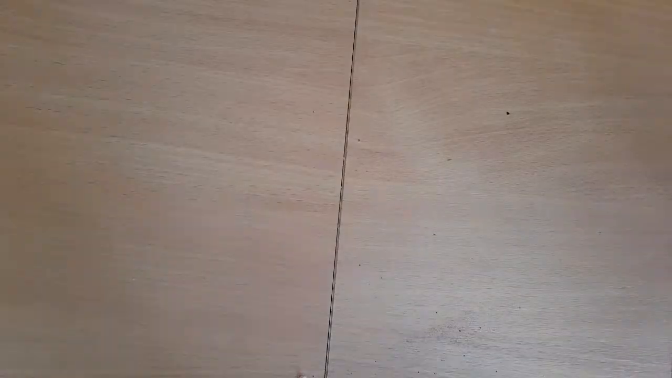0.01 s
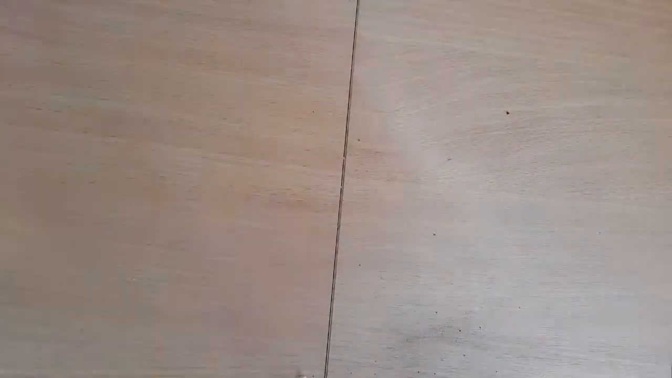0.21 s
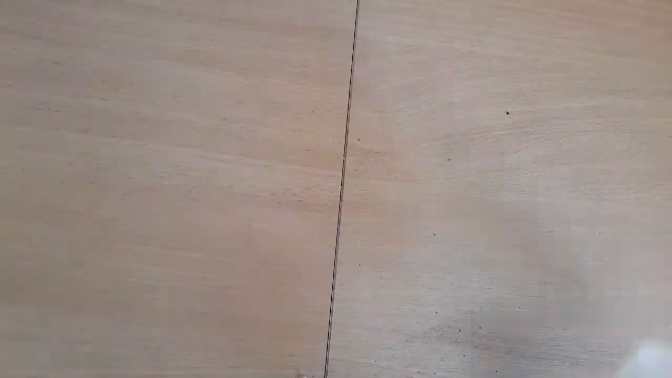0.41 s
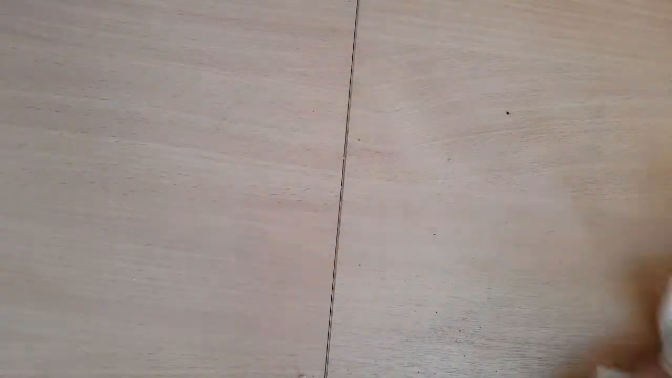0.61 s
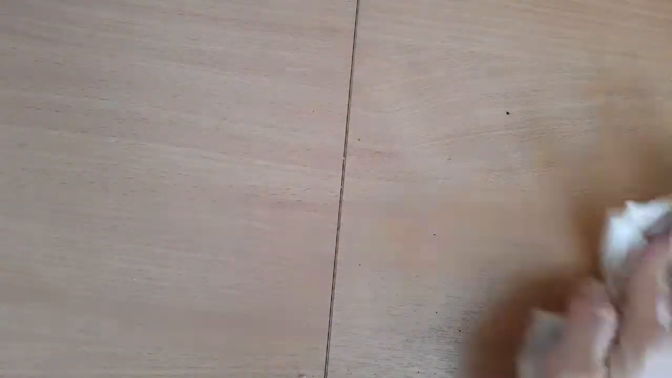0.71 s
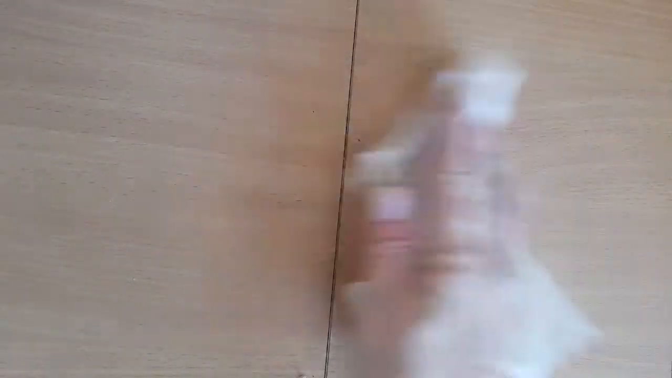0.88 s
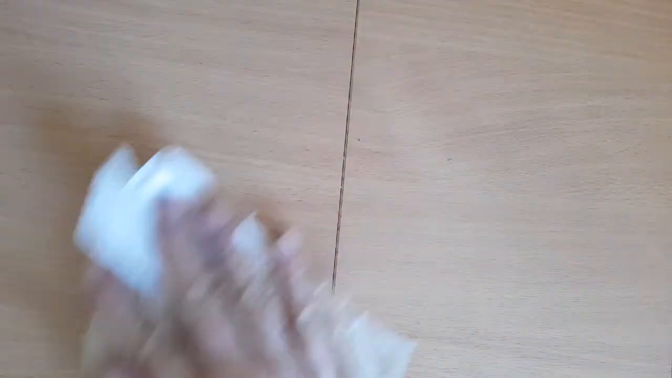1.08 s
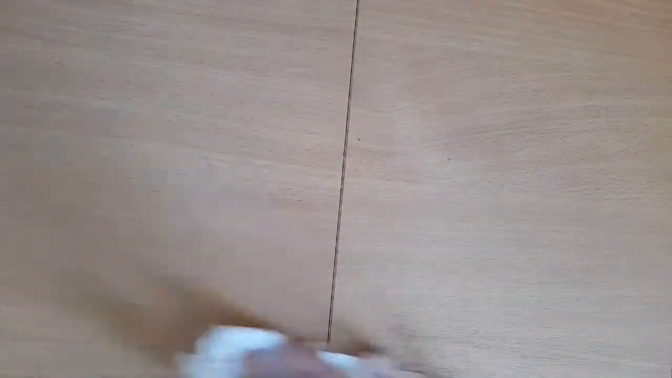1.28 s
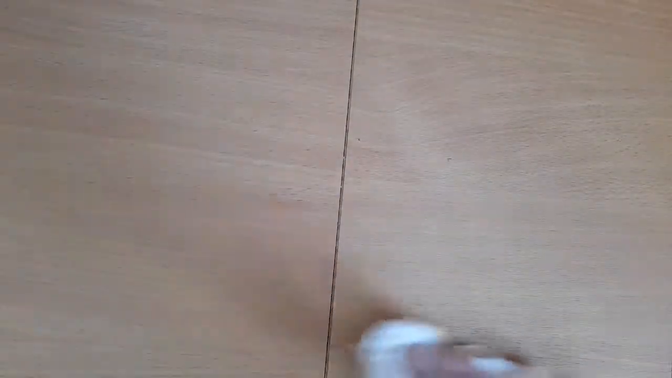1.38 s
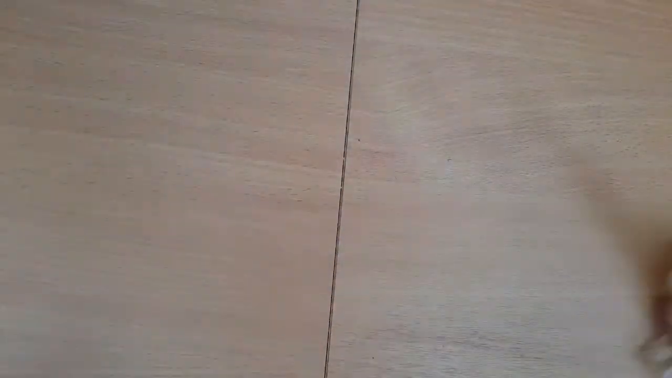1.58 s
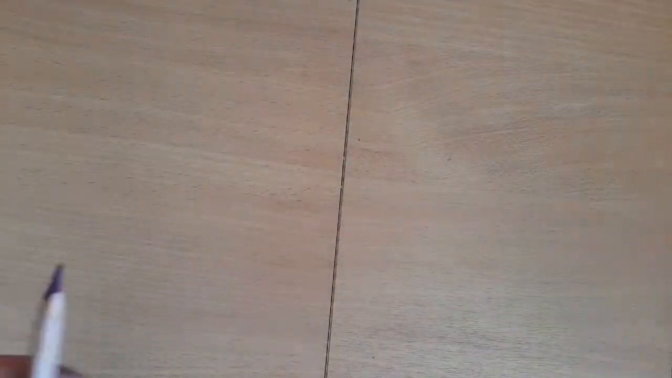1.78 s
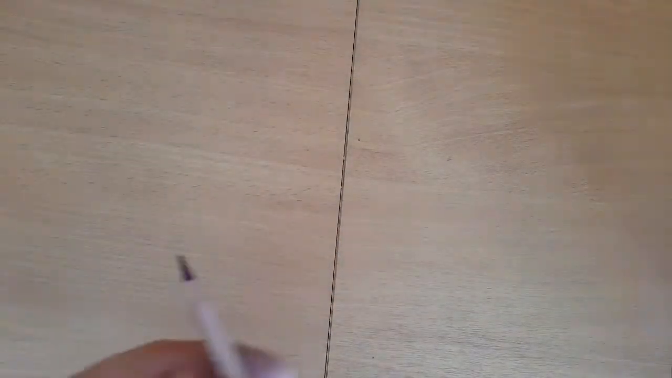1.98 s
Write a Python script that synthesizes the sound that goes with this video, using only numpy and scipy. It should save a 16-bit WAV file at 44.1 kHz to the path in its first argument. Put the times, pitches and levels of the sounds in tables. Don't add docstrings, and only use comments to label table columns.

```python
import sys
import numpy as np
from scipy import signal
from scipy.io import wavfile
from scipy.ndimage import uniform_filter1d, map_coordinates

SR = 44100
rng = np.random.default_rng(int(sys.argv[2]) if len(sys.argv) > 2 else 0)


def output_pcm(signal):
    pcm = np.clip(np.atleast_2d(signal).T, -1, 1) * 32767
    wavfile.write(sys.argv[1], SR, np.round(pcm).astype(np.int16))


def gain_from_db(level_db):
    decades = np.asarray(level_db, float) / 20
    return 10 ** decades


N = 90405


def rms_one(x):
    return x / np.sqrt(np.mean(x ** 2) + 1e-20)


def in_time(rows):
    s, *columns = np.transpose(rows)
    return [np.interp(np.arange(N) / SR, s, column) for column in columns]


def at_hz(points, hz):
    f, value = np.transpose(points)
    return np.interp(np.log(hz), np.log(f), value)


def band(x, low_hz, high_hz):
    return signal.sosfilt(signal.butter(2, [low_hz, high_hz], "band", fs=SR, output="sos"), x)


def drift(rate_hz):
    hop, settle = 40, 2000
    r = np.exp(-2 * np.pi * hop * rate_hz / SR)
    noise = rng.standard_normal(N // hop + settle + 2)
    slow = signal.lfilter([1], [1, -2 * r, r * r], noise)[settle:]
    return np.interp(np.arange(N) / hop, np.arange(len(slow)), rms_one(slow))


def ring(clicks, hz, t60_s):
    r, w = gain_from_db(-60 / (t60_s * SR)), 2 * np.pi * hz / SR
    return signal.lfilter([0, np.sin(w)], [1, -2 * r * np.cos(w), r * r], clicks + 1e-18)


def resonate(x, peaks):
    out = 0
    for k, (hz, width_hz, db) in enumerate(peaks):
        r = np.exp(-np.pi * width_hz / SR)
        poles = [1, -2 * r * np.cos(2 * np.pi * hz / SR), r * r]
        out = out + (-1) ** k * gain_from_db(db) * rms_one(signal.lfilter([1, 0, -1], poles, x))
    return out


def hollow(x, hz, width_hz):
    out, r, state = np.zeros_like(x), np.exp(-np.pi * width_hz / SR), np.zeros((2, 2))
    for i in range(0, N, 128):
        w = 2 * np.pi * hz[i] / SR
        poles = [1, -2 * r * np.cos(w), r * r]
        gain = np.abs(np.polyval(poles, np.exp(1j * w))) / np.sin(w)
        out[:, i:i + 128], state = signal.lfilter([gain, 0, -gain], poles, x[:, i:i + 128], zi=state)
    return rms_one(out)


def coloured(white, spectrum, patchy_db, rate_hz):
    # (frequency [Hz], coherence [0-1])
    likeness = [(60, 1), (250, 0.64), (700, 0.68), (1400, 0.63), (3000, 0.02), (7000, 0)]
    out, together = 0, drift(rate_hz)
    lowest_hz, highest_hz = spectrum[0][0], spectrum[-1][0]
    count = int(3 * np.log2(highest_hz / lowest_hz)) + 2
    edges = np.geomspace(lowest_hz, min(highest_hz, .45 * SR), count)
    for k, (low, high) in enumerate(zip(edges, edges[1:])):
        mid, side = band(white[k % 2], low, high)
        hz = np.sqrt(low * high)
        alike = np.clip(at_hz(likeness, hz), 0, 1)
        gain = gain_from_db(at_hz(spectrum, hz) + patchy_db * (0.6 * together + drift(rate_hz)))
        out = out + gain * (np.sqrt(1 + alike) * mid + np.sqrt(1 - alike) * side * [[1], [-1]])
    return rms_one(out)


def hum():
    # (frequency [Hz], density [dB per Hz])
    rumble = [(15, -20), (30, -1), (60, 0.5), (100, 3.5), (160, 0), (250, -16), (350, -28), (600, -22),
              (1100, -36)]
    # (frequency [Hz], width [Hz], level [dB])
    hum_modes = [(87.8, 23, -65), (120.5, 9.6, -66.5), (189.6, 13, -72.5)]
    mid, side = rng.standard_normal((2, N + SR))
    modes = resonate(mid + 0.27 * side * [[1], [-1]], hum_modes)[:, SR:]
    return modes + gain_from_db(-65.5) * coloured(rng.standard_normal((2, 2, N)), rumble, patchy_db=1.0, rate_hz=11)


def rustles():
    # (time [s], length [s], level [dB], lowest [Hz], highest [Hz])
    fold_bursts = [(0.0, 0.078, -61, 1780, 6000), (0.125, 0.036, -64.5, 3000, 3540),
                   (0.183, 0.0075, -49.5, 2500, 13500), (0.308, 0.0058, -61, 2000, 14000),
                   (0.188, .03, -53, 150, 700), (0.714, .075, -42, 1240, 1800),
                   (1.022, 0.115, -50, 1180, 1820), (0.977, 0.03, -42.5, 1870, 7500),
                   (1.144, 0.052, -46.5, 1160, 2050), (1.878, .004, -57, 5000, 9000),
                   (1.9, 0.015, -57, 2500, 10000), (1.901, 0.072, -65.5, 2680, 3100),
                   (1.919, 0.048, -64.5, 3140, 5130), (1.978, .003, -67, 3000, 7000),
                   (2.026, .003, -75, 5000, 9000)]
    rise_s, fall_s, linger_s = 0.0065, 0.0058, 0.014
    t = np.arange(N) / SR
    paper = rng.standard_normal((2, N)) * gain_from_db(2 * drift(160))
    out = 0
    for s, length_s, db, low_hz, high_hz in fold_bursts:
        envelope = np.minimum((t - s) / rise_s, (s + length_s + linger_s - t) / fall_s)
        out = out + gain_from_db(db) * np.clip(envelope, 0, 1) * rms_one(band(paper, low_hz, high_hz))
    return out


def hiss(speed_db, sheen_hz):
    # (frequency [Hz], density [dB per Hz])
    fibre_spectrum = [(290, -76), (500, -38), (640, -35), (919, -25), (1250, -14.5), (2010, -11.5),
                      (3200, -4.5), (10800, -4), (16000, -4.5)]
    fibres = coloured(rng.standard_normal((2, 2, N)), fibre_spectrum, patchy_db=1.13, rate_hz=33)
    sheen = hollow(rng.standard_normal((2, N)), np.clip(sheen_hz, 3000, 15000), width_hz=4300)
    return gain_from_db(speed_db) * (fibres + gain_from_db(-4.5) * sheen) + rustles()


def grains():
    grains_per_s, spread_db, clump_db = 4000, 2.5, 1.5
    size = gain_from_db(spread_db * np.minimum(rng.exponential(1, N), 5))
    born = rng.random(N) < grains_per_s * gain_from_db(clump_db * drift(90)) / SR
    burst = uniform_filter1d(size * born, size=12) + 0.022
    return burst * rng.standard_normal((2, 2, N))


def drag():
    # (time [s], level [dB], hollow under the hand [Hz], weight on the boards [dB])
    pressure = [(0.0, -59.5, 1960, -19), (0.13, -63.5, 1760, -14), (0.18, -57.5, 830, -13),
                (0.24, -48, 760, -0.5), (0.32, -43.5, 1050, -6), (0.59, -47.5, 880, -14),
                (0.64, -39.5, 1010, -9.5), (0.76, -38, 1380, -17.5), (0.8, -44.5, 1310, -22),
                (0.95, -57.5, 1440, -21.5), (0.99, -46.5, 1120, -25), (1.04, -50.5, 1510, -21.5),
                (1.5, -63, 1480, -10), (1.58, -52, 1190, -20.5), (1.72, -57.5, 1540, -18.5),
                (1.81, -54, 1310, -38), (1.87, -57.5, 1050, -25), (2.0, -77, 900, -17)]
    # (frequency [Hz], density [dB per Hz])
    scrape_spectrum = [(260, -60), (450, -21), (583, -4.5), (645, 8), (835, -10), (951, 1.5), (1130, -6),
                       (4300, -3), (14000, -32.5)]
    # (frequency [Hz], width [Hz], level [dB])
    table_modes = [(671, 28, -4), (705, 180, 2.5), (874, 9, -3.5), (937, 22, 3.5), (1216, 8, -4.5),
                   (1313, 7, 5), (1470, 61, -3.5), (1570, 6, -7), (1804, 10, 2.5), (2702, 36, 6),
                   (4670, 55, -8)]
    # (lowest [Hz], highest [Hz])
    boards_hz = (148, 394)
    db, hollow_hz, weight_db = in_time(pressure)
    scrape = coloured(grains(), scrape_spectrum, patchy_db=.8, rate_hz=40)
    mid, side = band(rng.standard_normal((2, N)), *boards_hz)
    boards = rms_one(mid + 0.41 * side * [[1], [-1]]) * gain_from_db(weight_db + 1.6 * drift(70))
    cup = hollow(scrape, np.clip(hollow_hz, 300, 3000), width_hz=740)
    wood = rms_one(resonate(scrape, table_modes))
    return gain_from_db(db) * (gain_from_db(-1.5) * scrape + gain_from_db(-5.5) * cup + gain_from_db(-6) * wood + boards)


def catches():
    # (time [s], peak [dB], ring [Hz], run of slips [s], crack [dB])
    catch_events = [(0.189, -36, 850, 0.0071, 7), (.229, -28.5, 810, 0.0086, -11),
                    (.253, -29, 826, 0.011, -8), (.265, -31, 1950, .003, -3), (.266, -32.5, 764, 0.0044, 2),
                    (.277, -23, 335, 0.0067, 0), (.305, -29, 546, 0.0067, 5.5),
                    (.372, -29.5, 948, 0.0066, 9.5), (.389, -28.5, 705, 0.0042, 5),
                    (.416, -29, 906, 0.0044, 6), (.443, -31, 910, .004, 3), (.479, -61, 820, 0.0035, 0),
                    (.557, -33, 723, 0.005, 4), (.609, -28.5, 750, 0.0024, 2), (0.655, -35, 953, .01, 5),
                    (0.666, -24.5, 1280, 0.0023, -2), (0.675, -33, 1430, 0.0016, -5),
                    (0.71, -33, 1340, .006, 6), (0.721, -27, 1390, 0.0095, -8),
                    (.727, -32, 770, 0.0036, -15), (0.7553, -21.5, 1500, 0.0027, -26),
                    (.755, -32, 1830, 0.0044, -6), (.765, -32.5, 1588, 0.0091, -15),
                    (0.789, -34, 1395, .005, -4), (0.992, -33.5, 900, 0.0037, 8),
                    (1.175, -41.5, 1402, 0.022, 10), (1.603, -44.5, 1172, 0.0089, 9),
                    (1.81, -45, 780, 0.0049, -2), (1.875, -39, 1220, .002, -8),
                    (1.885, -43, 1240, .003, -6), (1.912, -46.5, 920, 0.0032, 5),
                    (1.955, -45, 740, .003, -5)]
    t60_s, tone_db, all_cracks_db = 0.017, -4, -2.5
    size = 4096
    out, t = np.zeros(N + size), np.arange(size) / SR
    for s, db, hz, run_s, crack_db in catch_events:
        uneven, noise = rng.uniform(0.15, 1, size), rng.standard_normal(size)
        new_cycle = np.diff(np.floor(t * hz), prepend=-1) > 0
        slips = new_cycle * (t <= run_s) * uneven / np.sqrt(1 + run_s * hz)
        tone = band(ring(slips, hz, t60_s), .5 * hz, 2 * hz)
        crack = band(gain_from_db(-60 * t / (t60_s + run_s)) * noise, 1900, 3900)
        start = int(s * SR)
        out[start:start + size] += gain_from_db(db) * (gain_from_db(tone_db) * tone + gain_from_db(all_cracks_db + crack_db) * crack)
    return out[:N]


def thumps():
    # (time [s], peak [dB])
    palm_blows = [
        (0.213, -48.5),
        (0.271, -45),
        (0.297, -44),
        (0.561, -44.5),
        (0.665, -35),
        (0.759, -48),
        (1.169, -43.5),
        (1.534, -49),
        (1.631, -50.5),
    ]
    # (frequency [Hz], level [dB], t60 [s])
    plate_modes = [(99.3, 2, 0.19), (128, -13, 0.052), (176, -11.5, 0.097), (326, -17, 0.04)]
    s, db = np.transpose(palm_blows)
    pan_db = 1.5 * np.outer([.5, -.5], (-1) ** np.arange(len(s)))
    pushes = np.zeros((2, N))
    pushes[:, (s * SR).astype(int)] = gain_from_db(db + pan_db)
    soft_palm = signal.butter(4, 186, fs=SR, output="sos")
    pushes = signal.sosfilt(soft_palm, pushes + 1e-18)
    plate = sum(gain_from_db(level_db) * ring(pushes, hz, t60_s) for hz, level_db, t60_s in plate_modes)
    return signal.sosfilt(signal.butter(2, 47, "high", fs=SR, output="sos"), plate)


def snap():
    # (frequency [Hz], level [dB], t60 [s])
    fold_modes = [(6500, -1, .001), (9000, -5, .0012), (12000, -7, .001), (14500, -7, .001)]
    snap_s, snap_db, left_db, left_lag_s = .75346, -12, -7, .0002
    growing = [(.00046, -12), (.00031, -5), (.00016, -3)]  # (lead [s], level [dB])
    sharp = [(.00012, 0)]
    out = np.zeros((2, N))
    for k, (hz, ring_db, t60_s) in enumerate(fold_modes):
        click = np.zeros((2, N))
        for before_s, db in growing if k == 0 else sharp:
            click[0, int((snap_s + left_lag_s - before_s) * SR)] = gain_from_db(snap_db + db + left_db)
            click[1, int((snap_s - before_s) * SR)] = gain_from_db(snap_db + db)
        out += gain_from_db(ring_db) * ring(click, hz, t60_s)
    return band(out, 3000, 16000)


def placed(x, pan_db, lag_ms):
    lag, i = lag_ms * SR / 2000, np.arange(N)
    left = map_coordinates(x[0], [i - lag], order=5, mode="nearest")
    right = map_coordinates(x[1], [i + lag], order=5, mode="nearest")
    return gain_from_db(np.outer([.5, -.5], pan_db)) * np.array([left, right])


def room(x):
    t = np.arange(int(.4 * SR)) / SR
    tail = rng.standard_normal((2, len(t))) * gain_from_db(-60 * t / .15) * (t > .002)
    tail = tail / np.sqrt(np.sum(tail ** 2, axis=1, keepdims=True))
    return gain_from_db(-12) * signal.fftconvolve(x[None], tail, axes=1)[:, :N]


def scene():
    # (time [s], hiss level [dB], left-right [dB], sheen [Hz], left lag [ms])
    stroke = [(0.0, -60.5, 2.5, 8930, 0.0097), (0.15, -67.5, 1.5, 7700, 0.11),
              (0.36, -44.5, -0.5, 9250, 0.082), (0.46, -50, -0.5, 8200, 0.14),
              (0.61, -48, -0.5, 8550, 0.25), (0.71, -39, -0.5, 8200, 0.21), (0.76, -39.5, 2, 7350, 0.05),
              (0.8, -40, -0.5, 10500, 0.11), (0.95, -41, 0, 12300, 0.094), (0.98, -39.5, -1, 10900, -0.11),
              (1.14, -38.5, 3, 12000, 0.0079), (1.24, -37, 3, 9800, -0.13),
              (1.36, -37.5, 1.5, 11500, -0.097), (1.72, -38, -2, 10800, 0.29),
              (1.77, -45.5, -1.5, 8900, 0.35), (1.85, -54.5, -2, 7600, 0.3), (1.87, -61, -1.5, 7800, 0.25),
              (2.05, -72.5, -2.5, 9400, 0.36)]
    speed_db, pan_db, sheen_hz, lag_ms = in_time(stroke)
    hits, fold = catches(), snap()
    hand = placed(drag() + hits + hiss(speed_db, sheen_hz), pan_db, lag_ms)
    air = gain_from_db(-77) * rng.standard_normal((2, N))
    return hand + fold + room(hits + fold[1]) + thumps() + hum() + air


def roll_off(x):
    return signal.sosfilt(signal.butter(12, 15840, fs=SR, output="sos"), x)


def record(dry):
    steep = signal.cheby2(16, 80, 16600, fs=SR, output="sos")
    mix = signal.sosfilt(steep, dry)
    return roll_off(mix)


dry = scene()
out = record(dry)
output_pcm(out)
```